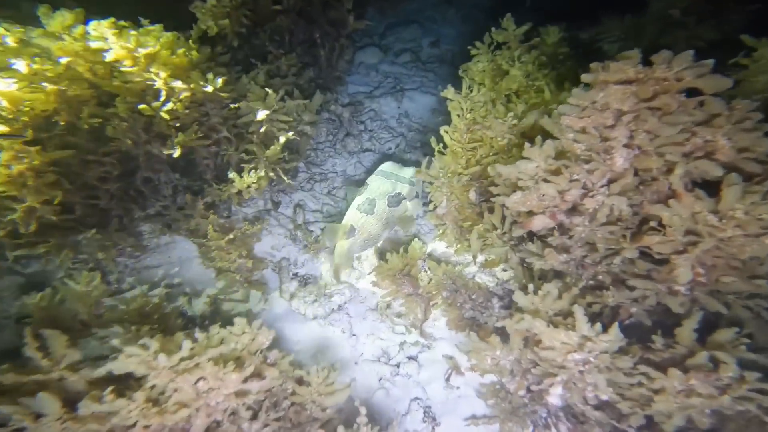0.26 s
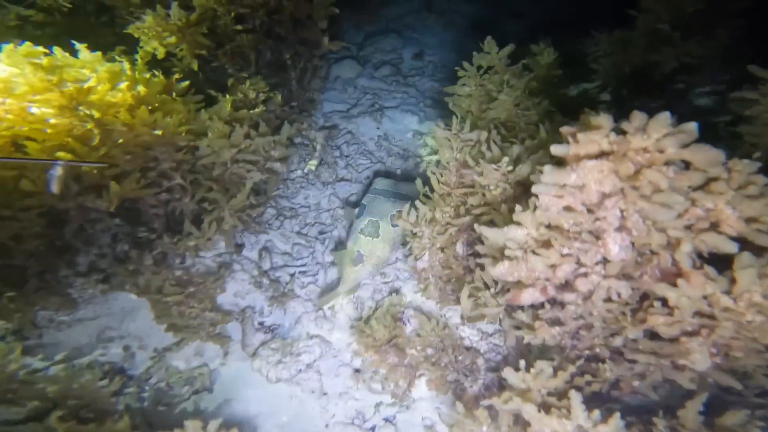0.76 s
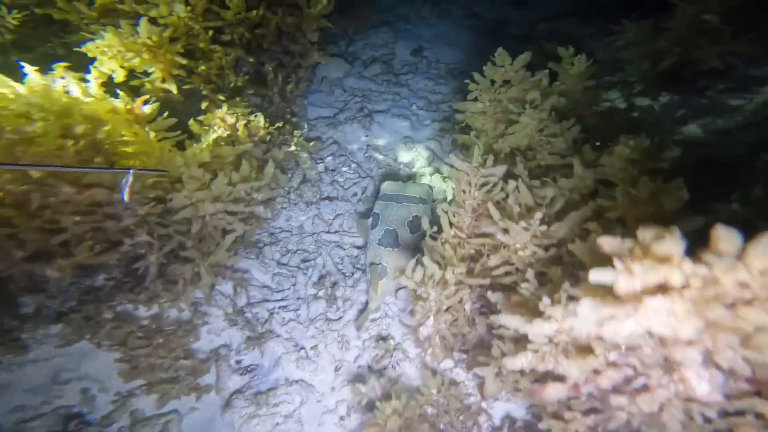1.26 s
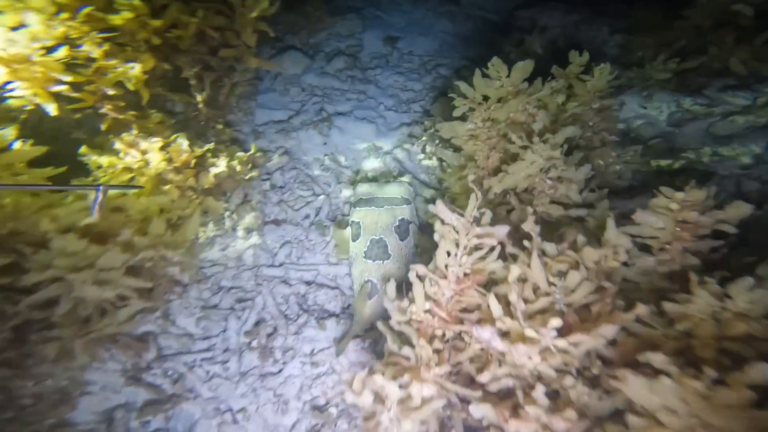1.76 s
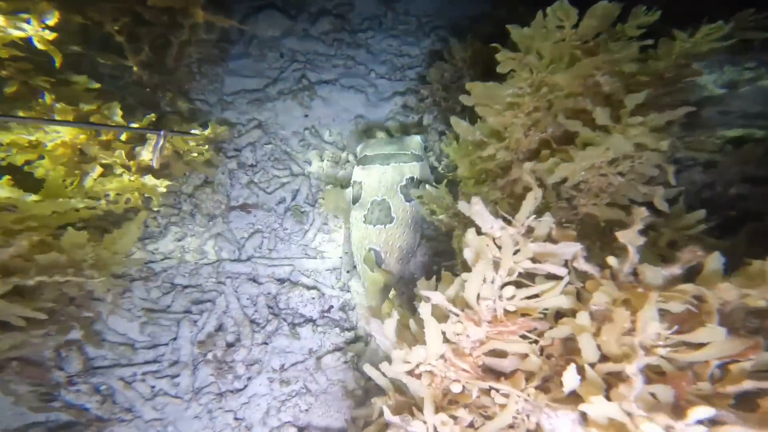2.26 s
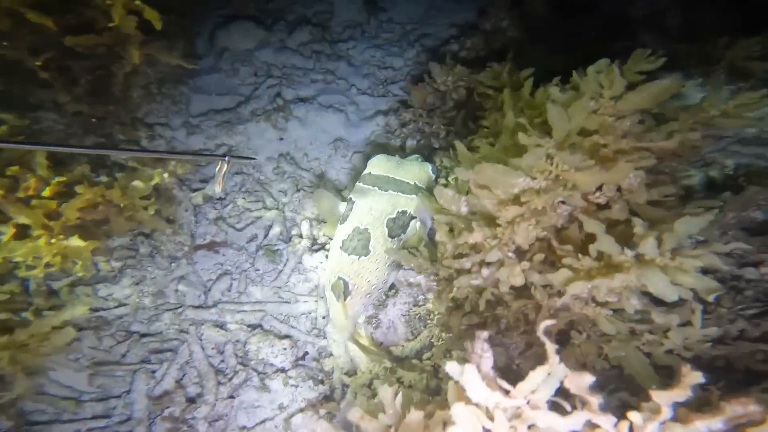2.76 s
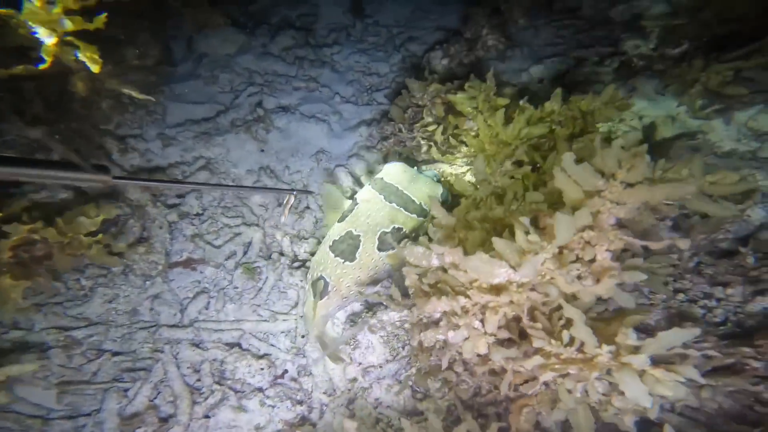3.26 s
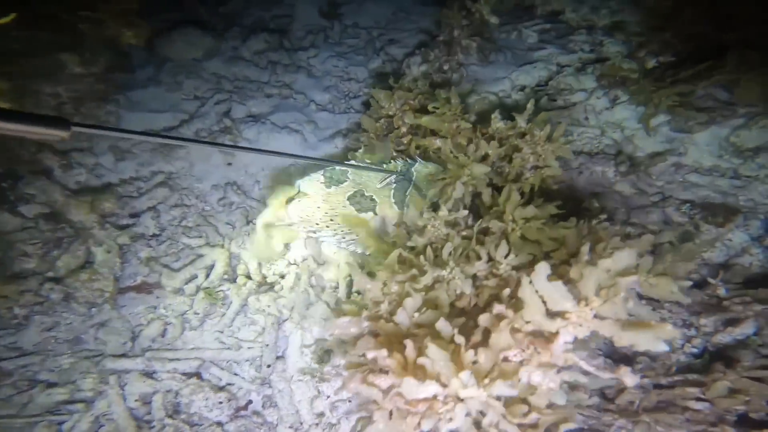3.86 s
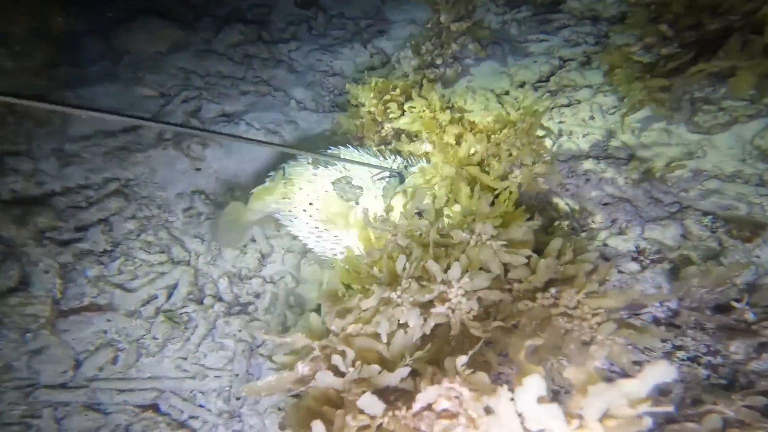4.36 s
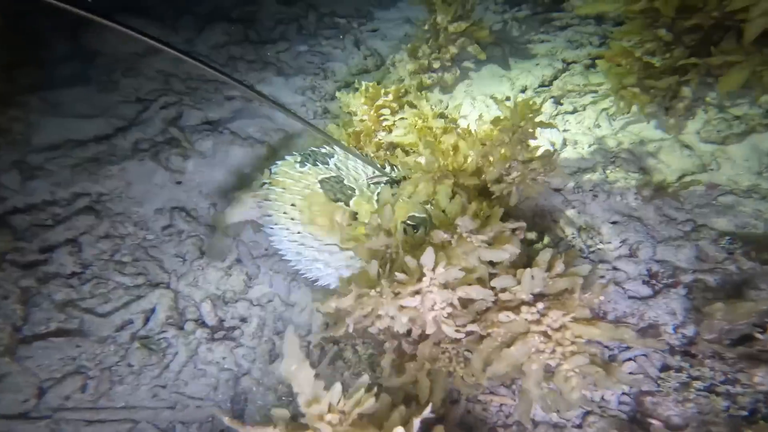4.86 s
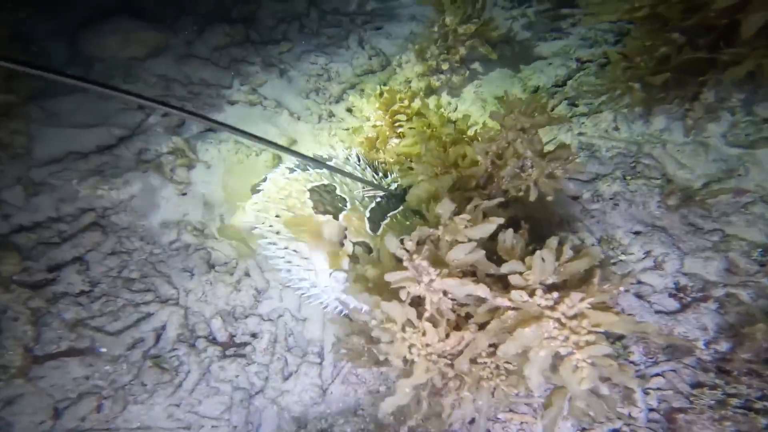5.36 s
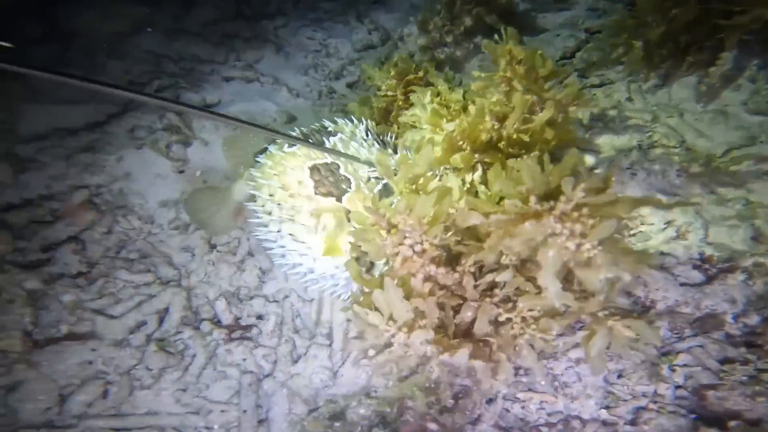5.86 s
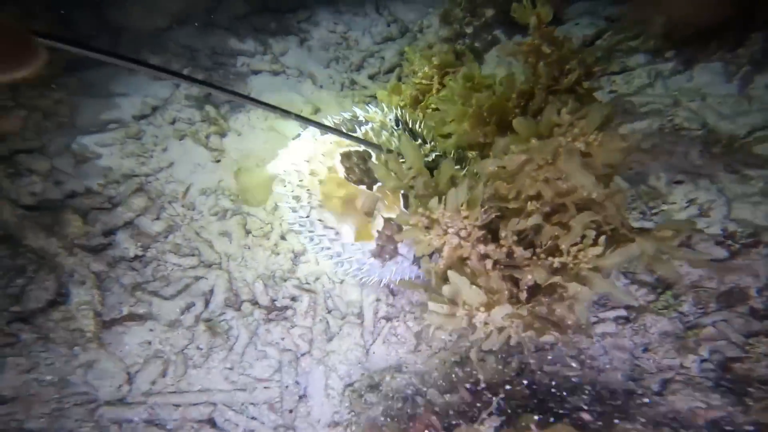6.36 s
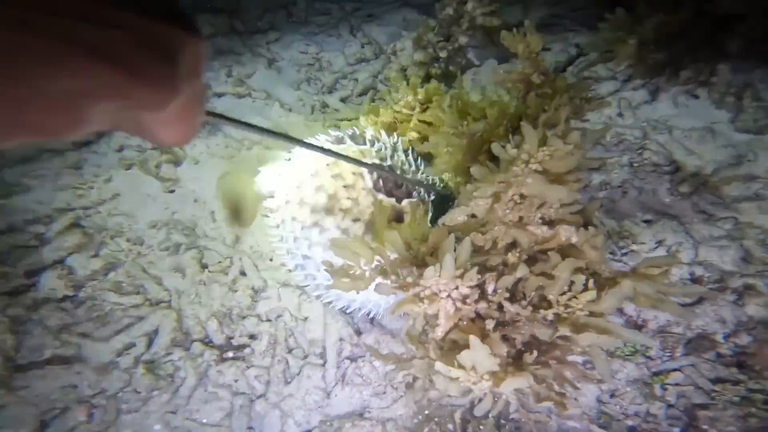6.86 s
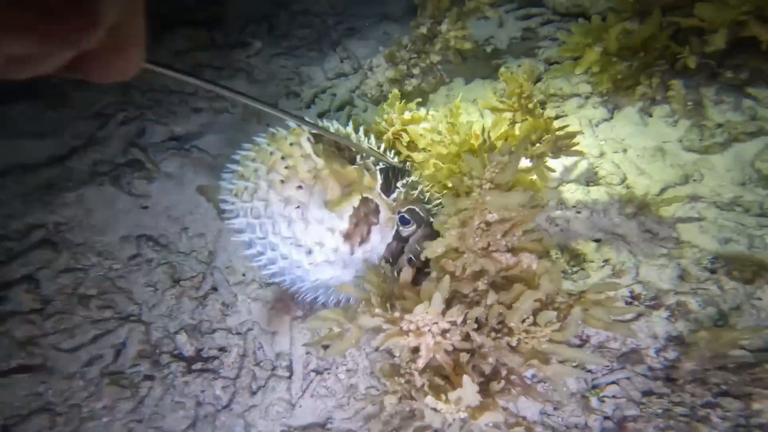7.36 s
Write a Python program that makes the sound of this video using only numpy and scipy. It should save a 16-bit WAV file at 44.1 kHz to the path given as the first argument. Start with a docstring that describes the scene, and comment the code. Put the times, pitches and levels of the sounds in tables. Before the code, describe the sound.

The sound is underwater, close and muffled, heard from inside a waterproof camera case, with a low swaying rumble throughout. For the first 2.3 seconds a diver's grip rubs and slides on the case, making hollow gurgles, small bubble blips and a few hard taps. After a quieter second, the loudest knock lands at about 3.4 seconds, briefly overloading the microphone. Sharp snaps, hollow knocks and short scrapes of a thin rod cluster until 4 seconds, and the sound opens from narrow to wide. An air pocket gulps low at about 4.6 seconds. From 5 to 6.5 seconds the gurgling continues with knocks and ringing taps, over a faint fizz like shrimp and grit. Around 7 seconds come a sharp snap, a strong knock, a scrape and a brief wet finger squeak. Soft, deep pushes of water and a few last taps close it at about 7.5 seconds.

```python
"""Hard taps and a hollow gurgle come first, over the low rumble of water swaying against a camera case.
A diver holds the waterproof case over a shallow reef and prods a pufferfish with a thin rod.
The grip knocks, rubs and slides, so the hollow case gurgles; air pockets gulp and a wet finger squeaks.
Taps, sharp snaps and the scraping rod ring the case wall, over a wet fizz as of shrimp and grit.
The sound starts narrow and widens, and the loudest knocks overload the microphone."""
import sys
import numpy as np
from scipy import signal
from scipy.fft import rfft, irfft, next_fast_len
from scipy.io import wavfile
from scipy.ndimage import map_coordinates

SR = 44100
rng = np.random.default_rng(int(sys.argv[2]) if len(sys.argv) > 2 else 0)


def inscribe(sig):
    """Save sig as 16-bit PCM at rate SR to the path in sys.argv[1].

    A 1-D sig is mono; a 2-D sig holds one channel per row.
    Samples are clipped to [-1, 1] before scaling.
    """
    pcm = np.round(np.clip(np.atleast_2d(sig).T, -1, 1) * 32767)
    wavfile.write(sys.argv[1], SR, pcm.astype(np.int16))


N = 335601

# slides of the hand on the case: start_s, length_s, level_db, centre_hz
HAND_SLIDES = [(0.056, 0.055, -14.5, 398), (0.288, 0.06, -18, 325), (0.515, 0.051, -19.5, 483),
               (0.701, 0.06, -33.5, 373), (1.079, 0.053, -17.5, 361), (1.193, 0.1, -15, 342),
               (1.662, 0.12, -19.5, 337), (1.951, 0.045, -23.5, 397), (2.131, .24, -25, 338),
               (3.115, 0.071, -26.5, 342), (3.289, 0.036, -23.5, 362), (6.13, 0.095, -24, 232),
               (6.285, 0.13, -25, 416), (6.975, 0.13, -23, 256)]
# tone of a rattle heard through the case wall: frequency_hz, level_db
WALL_TONE = [(300, -47), (700, -9), (1320, -1.5), (2900, -1.5), (3900, -7), (16000, -50)]
STROKE_RISE_S, STROKE_FADE_S, QUICK_RISE_S = 0.0096, 0.01, 0.0042
PITCH_WAVER = 0.05  # share by which a gulp or squeak wanders off its pitch


def knocks():
    """Each blow of the grip makes the case shudder; where it lands picks which hollow notes answer."""
    # blows on the case: start_s, level_db, centre_hz, ring_s (time to fade by 60 dB)
    blows = [(0.165, -7, 380, 0.08), (1.382, -5, 317, 0.064), (3.398, -2, 360, 0.22),
             (3.425, 9.5, 279, 0.032), (3.615, -7.5, 412, 0.12), (3.729, -13.5, 378, 0.28),
             (3.817, -7.5, 330, 0.15), (3.992, -17.5, 288, 0.33), (5.112, -10.5, 450, 0.33),
             (5.323, -9.5, 383, 0.16), (5.647, -12, 347, 0.096), (5.796, -1.5, 660, 0.091),
             (6.921, -2, 299, 0.12)]
    push_hz, push_db = 122.4, -10.5
    out, t = np.zeros((2, N)), np.arange(SR // 3) / SR
    push = peak_one(np.sin(2 * np.pi * push_hz * t) * t * np.exp(-2 * push_hz * t))
    for start_s, level_db, centre_hz, ring_s in blows:
        swell = peak_one((1 - np.exp(-(t / QUICK_RISE_S) ** 2)) * amp(-60 * t / ring_s))
        noise = rng.standard_normal((2, 2 * len(t)))
        contact = band_pass(noise, centre_hz / 1.466, centre_hz * 1.4)
        shudder = hollow_case(contact)[:, len(t):]
        ring = np.array([rms_one(swell * channel) for channel in shudder]) * np.sqrt(np.mean(swell ** 2))
        add(out, start_s, amp(level_db - 5) * ring)
        add(out[0], start_s, amp(level_db + push_db) * push)  # the blow also shoves the whole case
    return out


def rubbing(rub_gain):
    """Tiny slips of the grip come in clumps and keep the case gurgling; small bubbles blip among them."""
    slips = clicks(per_s=700, spread_db=2) * amp(2.7 * wobble(22))
    gurgle = rms_one(hollow_case(low_pass(slips, 620, order=4)))
    blips = bubbles(per_s=30, centre_hz=435, octaves=0.5, ring_s=0.08)
    return rub_gain * rms_one(gurgle + amp(-5) * blips)


def slides():
    """A slide is a dense run of slips; where the hand touches picks which hollow notes gurgle."""
    out, band_ratio = np.zeros((2, N)), 1.574
    slips = clicks(per_s=900, spread_db=2) * amp(2 * wobble(35))
    for start_s, length_s, level_db, centre_hz in HAND_SLIDES:
        swell = stroke(length_s)
        run = slips[:, round(start_s * SR):][:, :len(swell)]
        contact = band_pass(run, centre_hz / band_ratio, centre_hz * band_ratio)
        add(out, start_s, amp(level_db) * swell[:run.shape[-1]] * rms_one(hollow_case(contact)))
    return out


def taps():
    """A tap rings the wall around one note, set by where it lands, with little treble."""
    # hard, hollow taps on the case: start_s, level_db, pitch_hz
    hits = [(0.013, -9.5, 1950), (0.1405, -16.5, 1400), (0.2155, -17.5, 2120), (1.586, -18.5, 2034),
            (2.586, -18, 2070), (2.983, -18.5, 1387), (4.4139, -20.5, 1470), (4.4783, -19.5, 2120),
            (4.824, -21.5, 1270), (5.2949, -9.5, 2040), (5.5121, -19.5, 1500), (5.625, -9.5, 1920),
            (6.097, -4.5, 1920), (6.2975, -9, 2000), (6.3964, -9.5, 1810), (7.256, -7, 1624),
            (7.275, -17, 1760), (7.5268, -14, 1360)]
    out, t = np.zeros((2, N)), np.arange(SR // 12) / SR
    onset, ring_s = 1 - np.exp(-t / 0.0015), 0.028
    swell = onset * amp(-60 * t / ring_s)
    for start_s, level_db, pitch_hz in hits:
        band_ratio = 1 + 0.4 * amp(0.63 * level_db)  # harder taps ring a wider band
        burst = rng.standard_normal((2, len(t))) * swell
        rattle = rms_one(colour(burst, WALL_TONE)) + amp(-7) * rms_one(onset * wall_ring(t))
        body = band_pass(rattle, pitch_hz / band_ratio, pitch_hz * band_ratio, order=1)
        note = swell * np.sin(2 * np.pi * (pitch_hz * t + rng.random((2, 1))))
        tap = rms_one(body) + amp(-7.5) * rms_one(note) + amp(-16) * rms_one(wall_treble(burst))
        add(out, start_s, amp(level_db - 20.5) * rms_one(tap))
    return out


def snaps():
    """A snap rattles through the case for a few milliseconds and leaves the wall ringing."""
    # sharp snaps: start_s, body_db, treble_db
    cracks = [(0.028, -15.5, -25.5), (0.5001, -19.5, -28), (2.1392, -24.5, -39), (2.4129, -33.5, -24.5),
              (2.4393, -31, -36), (3.1473, -20.5, -38), (3.397, -9, -21.5), (3.403, -6, -22),
              (3.4137, -7.5, -17.5), (3.6, -28, -24), (3.6138, -17.5, -15.5), (3.6214, -14, -16),
              (3.7283, -22, -23.5), (3.8161, -17, -22.5), (3.828, -24.5, -30.5), (3.9884, -21.5, -25.5),
              (4.389, -33, -36.5), (5.061, -27.5, -34), (5.1549, -18.5, -33.5), (5.25, -31, -35),
              (5.3142, -29.5, -36), (5.4043, -23, -29.5), (5.5013, -18, -26.5), (5.647, -20.5, -29.5),
              (6.3836, -20, -37), (6.7308, -23.5, -34), (6.782, -16, -12), (6.9273, -10, -23.5),
              (7.0617, -15, -24)]
    out, t = np.zeros((2, N)), np.arange(SR // 12) / SR
    onset = 1 - np.exp(-t / 0.0016)
    tail = amp(-24.5 - 60 * t / 0.052)
    shape = (len(cracks), 2, len(t))
    bursts = lambda fade_s: rng.standard_normal(shape) * onset * (amp(-60 * t / fade_s) + tail)
    rattles = colour(bursts(fade_s=0.028), WALL_TONE)
    spits = wall_treble(bursts(fade_s=0.016))
    for (start_s, body_db, treble_db), rattle, spit in zip(cracks, rattles, spits):
        body = rms_one(rattle) + amp(2.5) * rms_one(onset * wall_ring(t))
        add(out, start_s, amp(body_db - 19.5) * rms_one(body) + amp(treble_db - 15) * rms_one(spit))
    return out


def gulps():
    """A pocket of air rings with one quivering, gliding note, then is cut short."""
    # air pockets at the case: start_s, level_db, start_hz, end_hz, length_s
    pockets = [(0.073, -8.5, 398, 440, 0.041), (2.513, -18, 455, 430, 0.023),
               (4.644, 0.5, 233.6, 213, 0.053), (5.806, -9.5, 459, 390, 0.022)]
    rise_s, ring_s, quiver_db = 0.004, 0.2, 2.2
    out, t = np.zeros(N), np.arange(SR // 3) / SR
    for start_s, level_db, start_hz, end_hz, length_s in pockets:
        glide_hz = end_hz + (start_hz - end_hz) * np.exp(-t / length_s)
        pitch_hz = glide_hz * (1 + PITCH_WAVER * wobble(110)[:len(t)])
        note = np.sin(2 * np.pi * np.cumsum(pitch_hz) / SR)
        swell = (1 - np.exp(-(t / rise_s) ** 2)) * amp(-60 * t / ring_s - (t / length_s) ** 4)
        quiver = amp(quiver_db * wobble(110)[:len(t)])
        add(out, start_s, amp(level_db) * peak_one(swell * quiver * note))
    return out


def squeak():
    """A wet finger sticks and slips: a rough note with weak overtones that rises and sinks."""
    # path of the squeak's note: time_s, pitch_hz
    glide = [(6.995, 499), (7.015, 574.4), (7.055, 483)]
    start_s, length_s, level_db = glide[0][0], 0.072, -14.5
    pitch_hz = over_time(glide) * (1 + PITCH_WAVER * wobble(300))
    phase = 2 * np.pi * np.cumsum(pitch_hz) / SR
    note = np.sin(phase) + amp(-23.5) * (np.sin(2 * phase) + np.sin(3 * phase))
    swell, = stroke_gains([(start_s, length_s, level_db)], rise_s=QUICK_RISE_S)
    return swell * rms_one(note * amp(3.5 * wobble(160)))


def scrapes():
    """The rod catches and slips in quick little jerks that keep the wall ringing."""
    # scrapes on sand and weed: start_s, length_s, ring_db, fizz_db
    drags = [(3.372, 0.11, -31, -40.5), (3.475, 0.08, -36.5, -42.5), (3.591, 0.035, -27, -36),
             (5.116, 0.076, -36.5, -51), (5.305, 0.025, -29.5, -43.5), (6.983, 0.1, -29.5, -39.5)]
    out, t = np.zeros((2, N)), np.arange(SR // 10) / SR
    jerks = patter(per_s=320, spread_db=2, fade_s=0.022)
    for start_s, length_s, ring_db, fizz_db in drags:
        swell = stroke(length_s)
        run = jerks[:, round(start_s * SR):][:, :len(swell)]
        ring = signal.fftconvolve(run, wall_ring(t), axes=1)[:, :len(swell)]
        body = amp(ring_db) * rms_one(colour(ring, WALL_TONE))
        fizz = amp(fizz_db) * rms_one(wall_treble(run))
        add(out, start_s, swell * (body + fizz))
    return out


def bubbles(per_s, centre_hz, octaves, ring_s):
    """Bubbles blip softly at random times, each climbing a little in pitch as it dies."""
    out, t = np.zeros(N), np.arange(int(ring_s * SR)) / SR
    swell = (1 - np.exp(-10 * t / ring_s)) * amp(-60 * t / ring_s)
    climb = 0.071 * t / ring_s
    for when, size, pitch in rng.random((int(per_s * N / SR), 3)):
        pitch_hz = centre_hz * 2 ** (octaves * (pitch - 0.5))
        add(out, when * N / SR, size * swell * np.sin(2 * np.pi * pitch_hz * t * (1 + climb / 2)))
    return rms_one(out)


def water(rub_gain):
    """Water presses on the case: a slow sway, a rumble that grows with movement, and soft pushes."""
    # strength of the flow: time_s, level_db
    flow = [(0, -21), (3.1, -21), (3.8, -27), (6.3, -17), (7.6, -19.5)]
    # tones of the sway and the rumble: frequency_hz, level_db
    sway_tone = [(3, -25.5), (10, 4), (16, -0.5), (36, -10.5), (55, -18), (170, -110)]
    rumble_tone = [(20, -34.5), (42, -7.5), (92, -1.5), (130, -21.5), (250, -24.5), (1200, -120)]
    # soft pushes of water: middle_s, level_db, pitch_hz
    pushes = [(3.897, -9.5, 63.4), (4.288, -14, 56.5), (4.484, -10, 58), (6.945, -7.5, 60.7),
              (7.158, -5, 53.8), (7.356, -3.5, 66.3)]
    flow_db = over_time(flow)
    sway = amp(flow_db + 1.5) * rms_one(colour(rng.standard_normal(N), sway_tone))
    rumble_gain = np.hypot(amp(flow_db - 18.5), amp(-5) * rub_gain)
    out = sway + rumble_gain * rms_one(colour(rng.standard_normal(N), rumble_tone))
    t = np.arange(-SR // 20, SR // 20) / SR
    for middle_s, level_db, pitch_hz in pushes:
        push = np.sin(2 * np.pi * pitch_hz * t) * np.exp(-(t * pitch_hz / 0.45) ** 2)
        add(out, middle_s + t[0], -amp(level_db) * peak_one(push))
    return out


def crackle(wash_gain, fizz_gain):
    """A lumpy wash lightly rings the wall; distant shrimp fizz, with nearer ticks standing out."""
    wash = patter(per_s=600, spread_db=2, fade_s=0.025) * amp(2.8 * wobble(24))
    ring = signal.fftconvolve(wash, wall_ring(np.arange(SR // 10) / SR), axes=1)[:, :N]
    body = rms_one(colour(rms_one(wash) + 0.5 * wobble(10) * rms_one(ring), WALL_TONE))
    dull_ticks = ticks(per_s=19, centre_hz=2398, octaves=0.53)
    grit = ticks(per_s=19, centre_hz=6040, octaves=0.93)
    fizz = rms_one(wall_treble(wash)) + amp(-1) * rms_one(wall_treble(grit))
    return wash_gain * (body + amp(-3.5) * dull_ticks) + fizz_gain * fizz


def ticks(per_s, centre_hz, octaves):
    """Scattered little ticks, each a brief spray of 20 tones, some duller and some brighter."""
    out, t = np.zeros((2, N)), np.arange(SR // 20) / SR
    pop = (1 - np.exp(-t * 1000)) * amp(-60 * t / 0.013)
    for when, size, pitch in rng.random((int(per_s * N / SR), 3)):
        tones_hz = centre_hz * 2 ** (octaves * (pitch - 0.5) + rng.uniform(-0.7, 0.7, (20, 1)))
        spray = np.sin(2 * np.pi * (tones_hz * t + rng.random((2, 20, 1)))).sum(axis=1)
        add(out, when * N / SR, size ** 2 * pop * spray)
    return rms_one(out)


def movement():
    """The diver's movements set how loud the rubbing, the wash and the fizz are."""
    # spells of swimming up, prodding and pinning the fish: start_s, length_s, rub_db, wash_db, fizz_db
    spells = [(0, 2.35, -31.5, -55, -85), (3.32, 0.19, -25.5, -48, -66), (4.66, 0.64, -29, -49, -55),
              (5.6, 0.89, -29.5, -48.5, -54.5), (6.7, 0.5, -24, -48.5, -51.5)]
    # water sloshing past the case: start_s, length_s, wash_db
    sloshes = [(1.215, 0.031, -39), (1.69, 0.026, -37), (2.11, 0.22, -46), (4.72, 0.1, -46.5)]
    still_rub_db, still_wash_db, still_fizz_db = -43, -57.5, -61
    rub, wash, fizz = stroke_gains(spells, rise_s=0.0052, fade_s=0.18)
    slide, = stroke_gains([row[:-1] for row in HAND_SLIDES])
    slosh, = stroke_gains(sloshes, rise_s=0.026, fade_s=0.026)
    together = lambda *gains: np.sqrt(sum(gain ** 2 for gain in gains))
    return (together(amp(still_rub_db), rub),
            together(amp(still_wash_db), wash, slosh, amp(-34) * slide),
            together(amp(still_fizz_db), fizz))


def hollow_case(sound):
    """The air and shell of the case ring at a few low, muffled notes."""
    # hollow notes of the case: pitch_hz, width_hz, level_db
    notes = [(164, 28, -5.5), (212, 83, -12.5), (272.2, 21, 4.5), (416.5, 29.4, 11.5), (491.5, 19, 0.5),
             (667, 580, -1.5)]
    # muffling by the case: frequency_hz, level_db
    muffle = [(40, -48.5), (135, 9), (200, 15), (540, -0.5), (850, -18.5), (1400, -9), (4000, -77.5)]
    return colour(resonate(sound, notes), muffle)


def wall_ring(t):
    """The stiff case wall rings with a new mix of its notes at every contact."""
    # notes of the wall: pitch_hz, level_db, ring_s
    notes = [(1303, -11, 0.083), (1399, -3.5, 0.036), (1578, -6, 0.046), (1697, 3, 0.012),
             (1978, -6, 0.036), (2170, -3.5, 0.034), (2730, -11.5, 0.033)]
    pitch_hz, level_db, ring_s = np.transpose(notes)[..., None]
    luck_db = 3 * rng.standard_normal(pitch_hz.shape)
    tones = np.sin(2 * np.pi * (pitch_hz * t + rng.random((2, len(notes), 1))))
    return np.sum(amp(level_db + luck_db - 60 * t / ring_s) * tones, axis=1)


def wall_treble(sound):
    """Treble reaches the microphones through the wall's highest notes."""
    # high notes of the wall: pitch_hz, width_hz, level_db
    notes = [(4860, 540, 5.5), (5534, 330, 8.5), (6380, 590, 0.5)]
    # tone of the fizz: frequency_hz, level_db
    fizz_tone = [(1500, -38), (3900, -13), (4500, -4), (7500, -9.5), (8200, -21.5), (15000, -34.5)]
    return colour(sound + resonate(sound, notes), fizz_tone)


def patter(per_s, spread_db, fade_s):
    """A crowd of soft puffs of noise that overlap at random."""
    t = np.arange(SR // 20) / SR
    puff = (1 - np.exp(-t * 1000)) * amp(-60 * t / fade_s)
    power = signal.fftconvolve(clicks(per_s, spread_db)[0] ** 2, puff ** 2)[:N]
    return rms_one(np.sqrt(np.abs(power)) * rng.standard_normal((2, N)))


def clicks(per_s, spread_db):
    """Two channels of clicks with shared random times and uneven sizes."""
    sizes = amp(spread_db * np.clip(rng.standard_normal(N), -2, 2))
    return rms_one((rng.random(N) < per_s / SR) * sizes * rng.standard_normal((2, N)))


def stroke(length_s, rise_s=STROKE_RISE_S, fade_s=STROKE_FADE_S):
    """A loudness curve that rises, holds until length_s and dies away."""
    t = np.arange(int((length_s + 8 * fade_s) * SR)) / SR
    return np.clip(t / rise_s, 0, 1) * np.exp(-np.maximum(t - length_s, 0) / fade_s)


def stroke_gains(rows, rise_s=STROKE_RISE_S, fade_s=STROKE_FADE_S):
    """One loudness curve for each level in rows of start_s, length_s, level_db, ..."""
    gains = np.zeros((len(rows[0][2:]), N))
    for start_s, length_s, *levels_db in rows:
        add(gains, start_s, np.outer(amp(levels_db), stroke(length_s, rise_s, fade_s)))
    return gains


def wobble(per_s):
    """A smooth random curve through per_s new values a second."""
    return map_coordinates(rng.standard_normal(int(N * per_s / SR) + 4), [np.arange(N) * per_s / SR])


def resonate(sound, notes):
    """Let a sound ring at notes given as pitch_hz, width_hz, level_db."""
    return filtered(sound, lambda hz: sum(
        amp(db) * 1j * hz * width / (pitch ** 2 - hz ** 2 + 1j * hz * width)
        for pitch, width, db in notes))


def colour(sound, tone):
    """Shape a sound by frequency_hz, level_db points, with no ringing ahead of it."""
    def response(hz):
        cepstrum = irfft(np.log(amp(over_pitch(tone, hz))))
        forward_only = 1 + np.sign(np.fft.fftfreq(len(cepstrum)))
        return np.exp(rfft(cepstrum * forward_only))
    return filtered(sound, response)


def filtered(sound, response):
    """Scale and shift each frequency by response(hz)."""
    length = sound.shape[-1]
    padded = next_fast_len(length + SR // 8)
    return irfft(rfft(sound, padded) * response(np.fft.rfftfreq(padded, 1 / SR)), padded)[..., :length]


def band_pass(sound, low_hz, high_hz, order=2):
    """Keep what lies between two frequencies."""
    return signal.sosfilt(signal.butter(order, [low_hz, high_hz], "band", fs=SR, output="sos"), sound)


def low_pass(sound, top_hz, order):
    """Keep what lies below top_hz."""
    return signal.sosfilt(signal.butter(order, top_hz, fs=SR, output="sos"), sound)


def over_pitch(points, hz):
    """Join frequency_hz, value points on a log scale and read them at hz."""
    points_hz, values = np.transpose(points)
    return np.interp(np.log(hz + 1), np.log(points_hz + 1), values)


def over_time(points):
    """Join time_s, value points into one value per sample."""
    return np.interp(np.arange(N) / SR, *np.transpose(points))


def add(track, start_s, sound):
    """Mix a sound into a track at start_s."""
    part = track[..., max(round(start_s * SR), 0):][..., :sound.shape[-1]]
    part += sound[..., :part.shape[-1]]


def amp(db):
    """Turn decibels into a gain."""
    return 10 ** (np.asarray(db) / 20)


def rms_one(sound):
    """Scale to an average (rms) level of 1."""
    return sound / np.sqrt(np.mean(sound ** 2) + 1e-20)


def peak_one(sound):
    """Scale to a peak of 1."""
    return sound / np.abs(sound).max()


def scene():
    """Two microphones share the case: they sound alike in the bass, less so in the treble."""
    # how alike left and right are: frequency_hz, likeness (0 to 1)
    likeness = [(200, 1), (1500, 0.71), (8500, 0.9)]
    # how much louder the left is at full width: frequency_hz, level_db
    left_louder = [(100, -0.3), (2200, 2.5), (5000, -2.5), (9000, 2.5)]
    # how far the left runs ahead at full width: frequency_hz, phase_radians
    left_ahead = [(200, 0), (1800, -0.6), (4200, 0)]
    # stereo width: time_s, side_db
    width = [(2.2, -17.5), (3.5, -0.5)]
    rub_gain, wash_gain, fizz_gain = movement()
    case = rubbing(rub_gain) + slides() + knocks() + snaps() + taps() + scrapes()
    case += crackle(wash_gain, fizz_gain)
    # mid is what left and right share; side is what sets them apart
    angle = lambda hz: np.arccos(np.clip(over_pitch(likeness, hz), 0, 1)) / 2
    mid, side = filtered(case, lambda hz: np.array([np.cos(angle(hz)), np.sin(angle(hz))]))
    mid = mid + water(rub_gain) + gulps() + squeak()
    lean = lambda hz: np.log(amp(over_pitch(left_louder, hz))) + 1j * over_pitch(left_ahead, hz)
    side = side + filtered(mid, lambda hz: np.tanh(lean(hz) / 2))
    side *= amp(over_time(width))
    return np.array([mid + side, mid - side])


def record(dry):
    """The camera flattens peaks that reach full scale and cuts off the highest treble."""
    clipped = dry / (1 + dry ** 16) ** (1 / 16)
    return low_pass(clipped, top_hz=16100, order=20)


dry = scene()
out = record(dry)
inscribe(out)
```